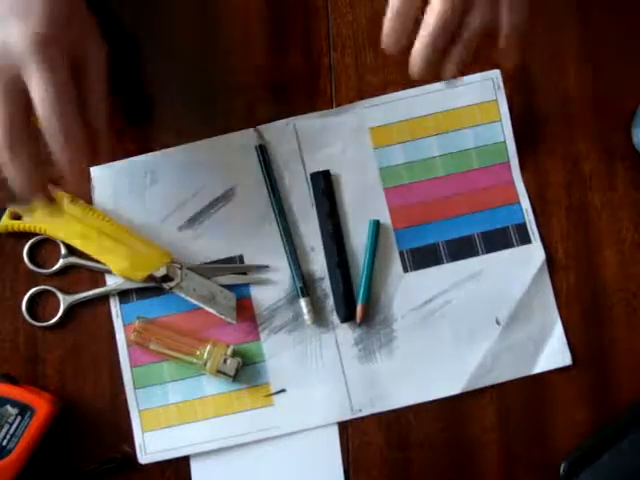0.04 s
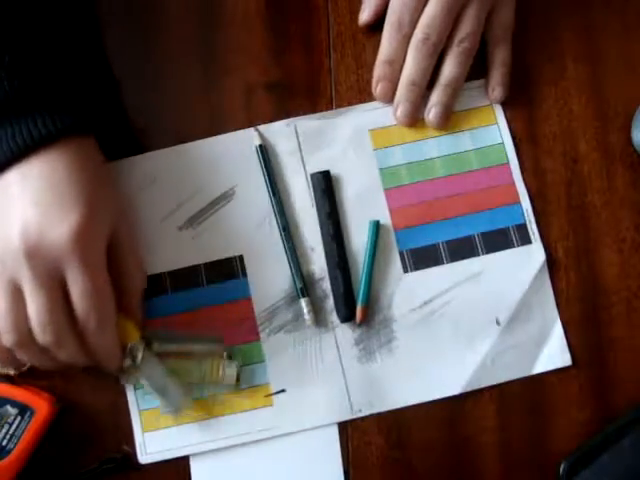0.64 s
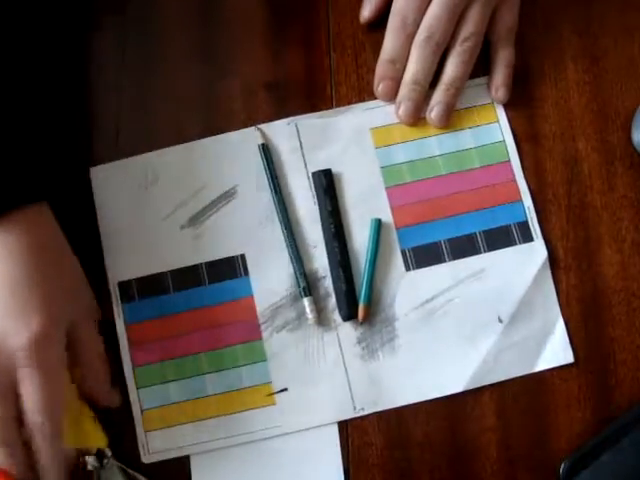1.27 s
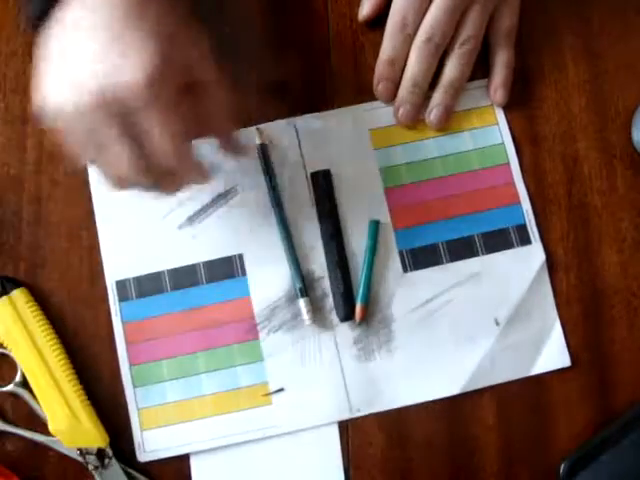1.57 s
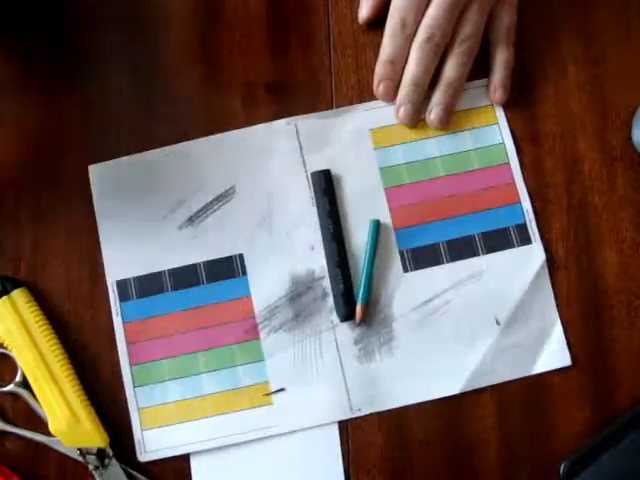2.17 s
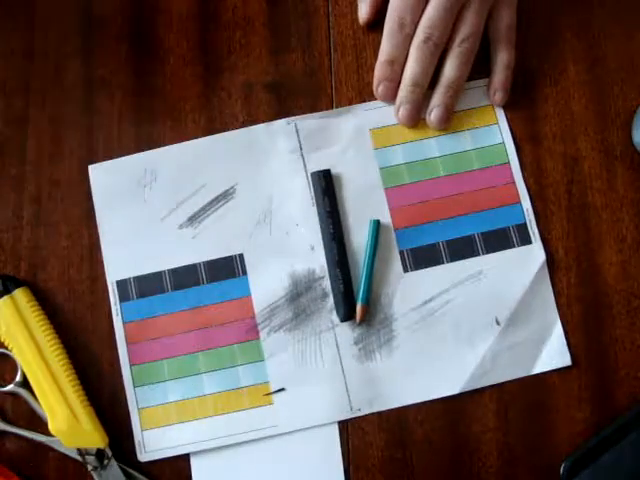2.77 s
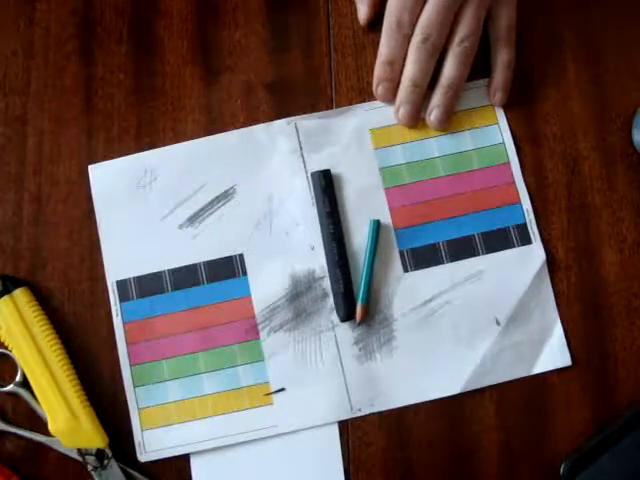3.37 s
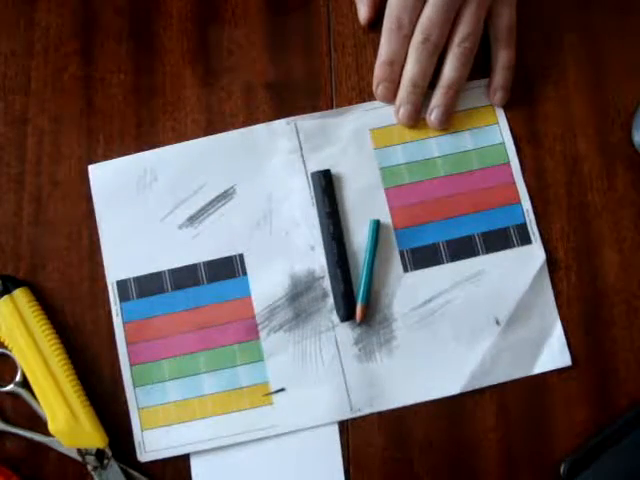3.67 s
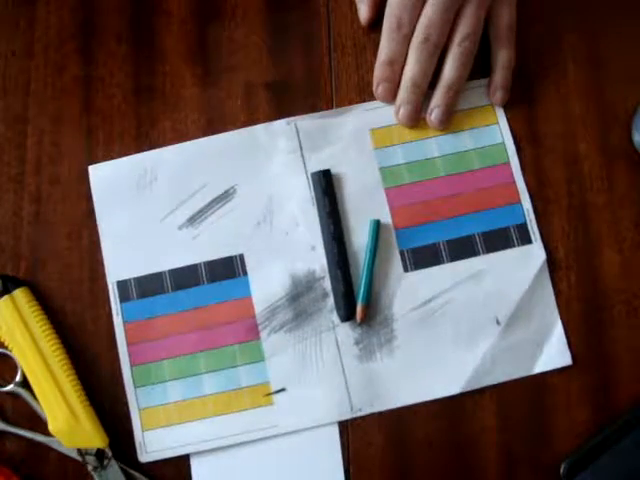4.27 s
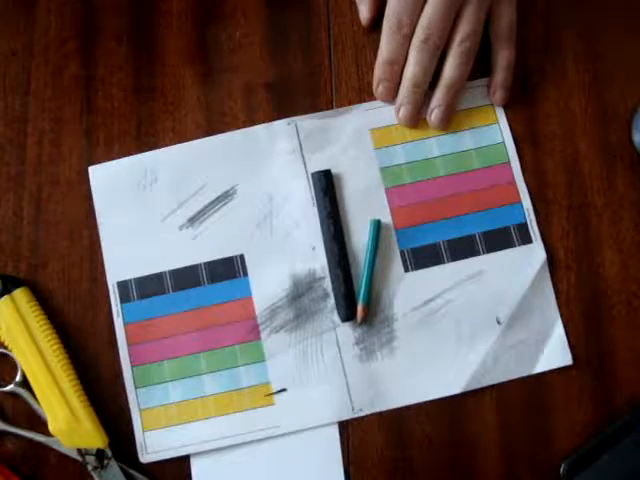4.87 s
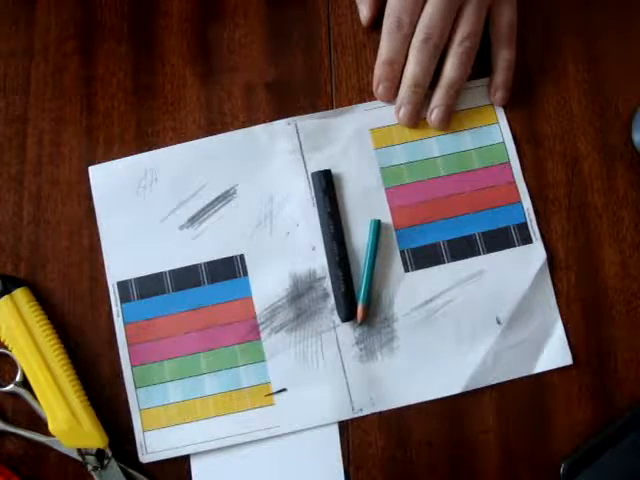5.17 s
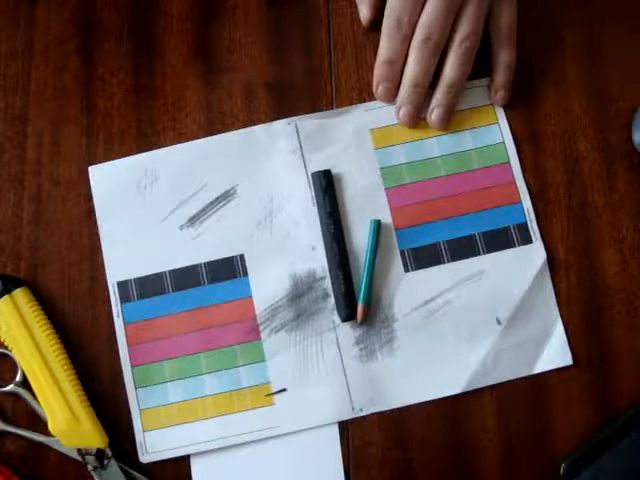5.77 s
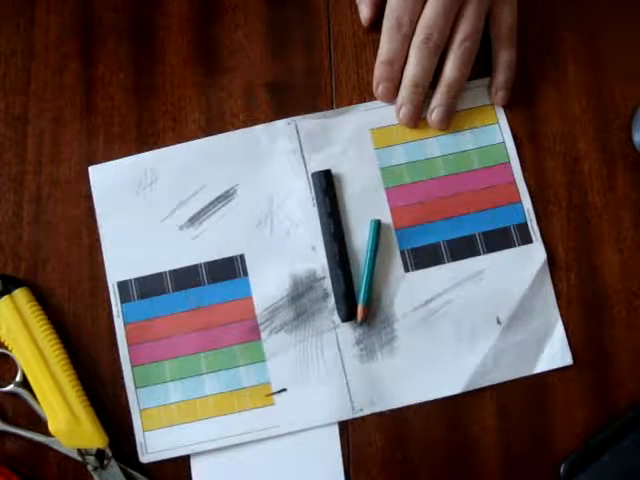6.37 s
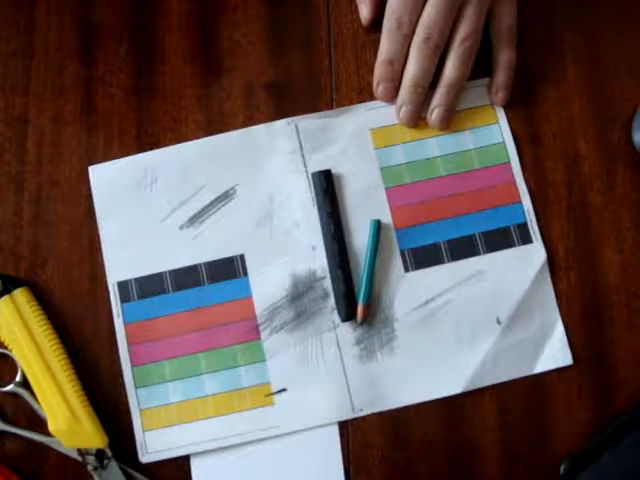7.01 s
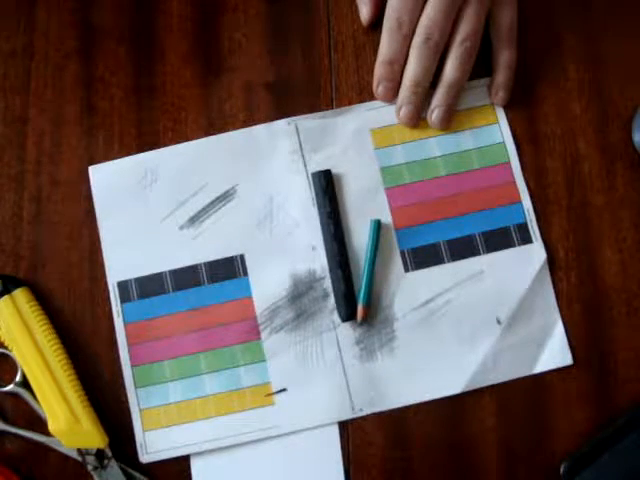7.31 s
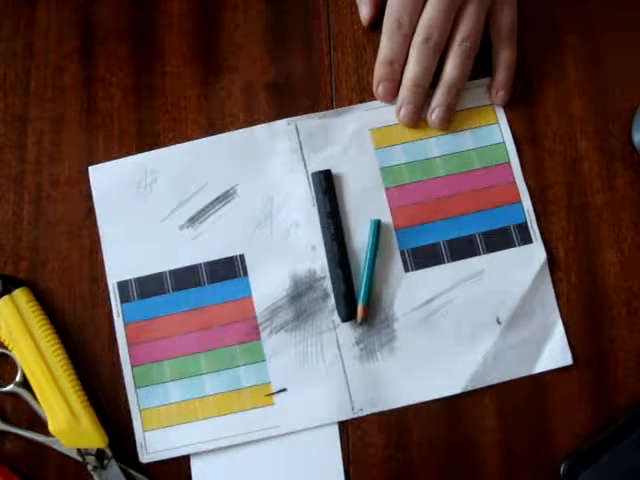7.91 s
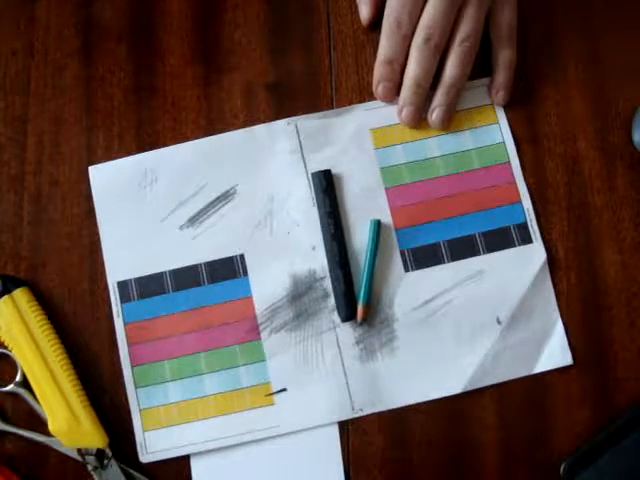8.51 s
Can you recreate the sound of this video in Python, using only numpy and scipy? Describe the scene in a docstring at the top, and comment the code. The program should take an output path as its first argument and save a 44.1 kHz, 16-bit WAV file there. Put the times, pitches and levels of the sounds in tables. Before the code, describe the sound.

A utility knife and steel scissors clink together, rasp over paper and drop onto a wooden table with a loud rattle and a soft thump. Fingers brush the paper, and a pencil slides off and taps the wood several times. Then a hand rummages among pencils in a small hollow box, making irregular clacks and light scrapes. The sound is close, in a quiet small room.

```python
"""Knife, scissors and pencils on a wooden table.

A utility knife and steel scissors are gathered, dragged over paper and dropped on the table.
A pencil is drawn off the paper and laid down; then a hand rummages among pencils in a small hollow box.
Each knock is a noisy crack over the object's ringing modes; each scrape is a stream of tiny slips.
The sound is close, in a quiet, small room."""
import sys
import numpy as np
from scipy import signal
from scipy.fft import rfft, irfft, next_fast_len
from scipy.io import wavfile

SR = 44100
rng = np.random.default_rng(int(sys.argv[2]) if len(sys.argv) > 2 else 0)


def inscribe(sig):
    """Save sig as 16-bit PCM at rate SR to the path in sys.argv[1].

    A 1-D sig is mono; a 2-D sig holds one channel per row.
    Samples are clipped to [-1, 1] before scaling.
    """
    pcm = np.round(np.clip(np.atleast_2d(sig).T, -1, 1) * 32767)
    wavfile.write(sys.argv[1], SR, pcm.astype(np.int16))


N = 381465
TIME = np.arange(N) / SR
RING_TIME = TIME[:SR * 2 // 5]  # 0.4 s for a knock or the room to ring out

# pencils knocking about in the box: start_s, clack_db, hardness_db (clack over thud)
BOX_HITS = [(3.756, -40, -3), (3.837, -43.5, -1.5), (3.943, -42.5, -10), (3.978, -39, -9.5),
            (4.1, -48, -7.5), (4.243, -43.5, -8.5), (4.385, -56.5, -17), (4.445, -30.5, 0.5),
            (4.463, -34, -8), (4.504, -22, -8.5), (4.514, -19.5, -1), (4.625, -32.5, 5),
            (4.645, -37.5, -6.5), (4.724, -37.5, -10.5), (4.772, -43, -19), (5.039, -48, -11),
            (5.213, -44.5, -5.5), (5.641, -53.5, -22), (5.656, -28.5, 5), (5.666, -32, -13),
            (5.74, -39, -12), (5.98, -50.5, -8), (6.05, -56, -17.5), (6.125, -50.5, -15),
            (6.49, -54.5, -22), (6.563, -41.5, -5), (6.607, -36.5, -5.5), (6.769, -45, -5.5),
            (6.967, -44, -5.5), (7.247, -37.5, 9), (7.263, -21.5, -9.5), (7.272, -30, -12),
            (7.307, -30, -7), (7.432, -40.5, -4), (7.553, -47, -10), (7.589, -35, 5), (7.626, -38, -4),
            (7.703, -29.5, 7.5), (7.756, -36, 2), (7.784, -40.5, -1.5), (7.917, -26.5, -4),
            (8.266, -33, 2.5), (8.285, -37.5, 7), (8.446, -43, 5)]


def from_db(db):
    """Decibels to gain."""
    return 10 ** (np.asarray(db) / 20)


def unit_rms(x):
    """Scale to unit rms."""
    return x / np.sqrt(np.mean(x ** 2) + 1e-20)


def unit_attack(x):
    """Scale a blow to unit rms over its first 16 ms."""
    return x / np.sqrt(np.mean(x[:int(.016 * SR)] ** 2) + 1e-20)


def at_hz(points, hz):
    """Read a table on a log-frequency axis."""
    freq_hz, value = np.transpose(points)
    return np.interp(np.log(hz), np.log(freq_hz), value)


def butter(x, hz, kind, order):
    """Causal Butterworth filter."""
    return signal.sosfilt(signal.butter(order, hz, kind, fs=SR, output="sos"), x + 1e-18)


def coloured(x, colour):
    """Shape a steady signal with an EQ curve; rms 1."""
    size = next_fast_len(len(x))
    hz = np.maximum(np.arange(size // 2 + 1) * SR / size, 1)
    spectrum = rfft(x, size) * from_db(at_hz(colour, hz))
    return unit_rms(irfft(spectrum, size)[:len(x)])


def decay(t60_s):
    """Envelope that loses 60 dB in t60_s."""
    return from_db(-60 * RING_TIME / t60_s)


def fader(points, fade_db_per_s=600):
    """Gain riding through (time_s, level_db) points, fading out beyond the ends."""
    time_s, level_db = np.transpose(points)
    beyond_s = np.maximum(time_s[0] - TIME, 0) + np.maximum(TIME - time_s[-1], 0)
    return from_db(np.interp(TIME, time_s, level_db) - fade_db_per_s * beyond_s)


def strokes(moves, rise_db_per_s, fall_db_per_s):
    """Gain of hand movements: each swells up to its start, holds and dies away."""
    power = 0
    for start_s, hold_s, level_db in moves:
        early_s, late_s = np.maximum(start_s - TIME, 0), np.maximum(TIME - start_s - hold_s, 0)
        drop_db = np.minimum(rise_db_per_s * early_s + fall_db_per_s * late_s, 100)
        power = power + from_db(level_db - drop_db) ** 2
    return np.sqrt(power)


def mode_rings(modes):
    """One decaying sine for each mode."""
    return np.array([from_db(db) * decay(t60_s) * np.sin(2 * np.pi * hz * RING_TIME)
                     for hz, db, t60_s in modes])


def blow(rings, colour, mode_db, crack_t60_s, body_t60_s, body_db, bounce, contact_s):
    """One contact: a crack, a crowd of short modes and the clear modes, struck again by tiny rebounds."""
    strengths = from_db(rng.normal(0, 3.0, len(rings)))
    crowd = coloured(rng.standard_normal(len(RING_TIME)), colour)
    crowd *= decay(crack_t60_s) + from_db(body_db) * decay(body_t60_s)
    strike = unit_attack(crowd) + from_db(mode_db) * unit_attack(strengths @ rings)
    strike *= 1 - np.exp(-(RING_TIME / contact_s) ** 2)  # the contact takes a moment to load
    out = strike.copy()
    rebounds_s = np.cumsum(rng.uniform(.002, .008, size=2))
    for lag in (rebounds_s * SR).astype(int) + 1:
        out[lag:] += bounce * rng.random() * strike[:-lag]
    return butter(out, 91, "high", order=2)  # small things radiate little bass


def knocks(hits, modes, colour, thud_top_hz, tick_db, tick_per_hardness, clack_top_hz=4400, **contact):
    """Blows in three bands: a harder contact has less thud under its clack and can have more tick."""
    out, rings = np.zeros(N + len(RING_TIME)), mode_rings(modes)
    for start_s, clack_db, hardness_db in hits:
        sound, start = blow(rings, colour, **contact), int(start_s * SR)
        thud = from_db(-hardness_db) * unit_attack(butter(sound, thud_top_hz, "low", order=4))
        clack = unit_attack(butter(sound, [thud_top_hz, clack_top_hz], "band", order=4))
        tick = unit_attack(butter(sound, clack_top_hz, "high", order=4))
        tick *= from_db(tick_db + tick_per_hardness * hardness_db)
        out[start:start + len(sound)] += from_db(clack_db) * (thud + clack + tick)
    return out[:N]


def friction(slips_per_s, spread_db):
    """Surfaces catch and slip: random clicks of uneven size."""
    sizes = from_db(spread_db * np.minimum(rng.exponential(1, N), 4))
    return (rng.random(N) < slips_per_s / SR) * sizes * rng.standard_normal(N)


def scrape(slips, modes, colour, mode_db):
    """Slips rasp directly and keep the object's modes ringing; rms 1."""
    response = rng.choice([-1, 1], len(modes)) @ mode_rings(modes)
    ringing = signal.fftconvolve(slips, response)[:N]
    return unit_rms(coloured(slips, colour) + from_db(mode_db) * unit_rms(ringing))


def room_tone(level_db=-50):
    """The quiet room's bed of soft, steady noise."""
    # EQ of the bed: freq_hz, gain_db
    air_colour = [(15, -54), (25, -15.5), (280, -6), (538, -1.5), (1030, -3.5), (2490, -8.5), (4340, -12.5),
                  (10200, -24.5), (13300, -46), (22000, -120)]
    return from_db(level_db) * coloured(rng.standard_normal(N), air_colour)


def room_reverb(x, wet_db, build_s):
    """Diffuse reflections build up quickly and die sooner in the treble."""
    # decay of the room: freq_hz, t60_s
    decay_times = [(130, 0.61), (600, 0.2), (2500, 0.12), (9000, 0.047)]
    tail, edges_hz = 0, np.geomspace(80, 12000, 8)
    for low, high in zip(edges_hz, edges_hz[1:]):
        band = butter(rng.standard_normal(len(RING_TIME)), [low, high], "band", order=2)
        tail = tail + band * decay(at_hz(decay_times, np.sqrt(low * high)))
    tail *= 1 - np.exp(-(RING_TIME / build_s) ** 2)
    return x + from_db(wet_db) * signal.fftconvolve(x, tail / np.linalg.norm(tail))[:N]


def low_thumps():
    """Low, soft thumps: a hand on the table, and the boom under the loudest blows."""
    # the thumps: start_s, level_db
    thumps = [(1.134, -38), (1.254, -35), (1.718, -42), (2.251, -38.5), (7.279, -41), (7.953, -44.5)]
    # low modes ringing in each thump: pitch_hz, level_db, t60_s
    modes = [(122, 0, .16), (145, -5, .12), (212, -4, .13)]
    impulses = np.zeros(N)
    for start_s, level_db in thumps:
        impulses[int(start_s * SR)] = from_db(level_db)
    boom = unit_attack(mode_rings(modes).sum(axis=0))
    return signal.fftconvolve(impulses, boom)[:N]


def pencil_on_table():
    """Fingers brush the paper; the pencil slides off and taps the table."""
    # finger and pencil taps: start_s, clack_db, hardness_db
    hits = [(0.241, -63, 12), (1.738, -37.5, 13), (2.242, -36, -9), (2.279, -27.5, 4.5), (2.465, -29, 11),
            (2.481, -38, 9), (2.5, -28, 22), (2.604, -26.5, 18), (2.699, -37.5, 3), (2.884, -39.5, 2.5),
            (3.138, -45, -2), (3.232, -48.5, 1)]
    # clear modes of a tap: pitch_hz, level_db, t60_s
    modes = [(393, -4, 0.18), (528, -0.5, 0.066), (689, 1, 0.16), (847, 4, 0.06), (1493, -0.5, 0.1),
             (2238, 6.5, 0.077), (2970, -30, 0.027)]
    # EQ of its crowd of weaker modes: freq_hz, gain_db
    colour = [(60, -4), (250, -1.5), (800, 4.5), (1200, -2.5), (3200, 1.5), (10200, -19)]
    # the pencil slides off the paper, then rolls on the wood: start_s, hold_s, level_db
    slides = [(2.0, 0.065, -34.5), (2.22, 0.047, -36.5), (2.62, 0.0067, -37)]
    # EQ of the slide: freq_hz, gain_db
    slide_colour = [(90, -61), (260, 3.5), (360, -3.5), (520, 3), (700, -24), (1000, 6), (1350, -6.5),
                    (2100, 0.5), (4500, -1), (6000, -20.5)]
    # fingers brushing the paper: start_s, hold_s, level_db
    brushes = [(.26, 0.025, -45.5), (1.795, 0.012, -32), (1.91, 0.13, -39.5), (2.03, 0.084, -47.5),
               (2.17, 0.12, -43), (3.32, 0.2, -53)]
    # EQ of that papery hiss: freq_hz, gain_db
    brush_colour = [(1000, -34.5), (3800, 2), (5300, 8), (6800, 0), (8500, 0), (10200, -12)]
    taps = knocks(hits, modes, colour, thud_top_hz=1060, tick_db=-9.5, tick_per_hardness=0.065,
                  mode_db=-8, crack_t60_s=0.022, body_t60_s=0.23, body_db=-3.5,
                  bounce=0.27, contact_s=0.00059)
    slide = scrape(friction(slips_per_s=6700, spread_db=0), modes, slide_colour, mode_db=-8)
    slide *= strokes(slides, rise_db_per_s=207, fall_db_per_s=176)
    brush = coloured(friction(slips_per_s=6700, spread_db=4), brush_colour)
    brush *= strokes(brushes, rise_db_per_s=276, fall_db_per_s=276)
    return taps + slide + brush


def pencil_clinks(over_clack_db=-6, db_per_hardness=.5, pitch_spread=.03):
    """The harder a knock in the box, the more the struck pencil itself rings, each at its own pitch."""
    # bending modes of a loose pencil: pitch_hz, level_db, t60_s
    modes = [(2290, -0.5, 0.19), (2920, -2.5, .11)]
    out = np.zeros(N + len(RING_TIME))
    tunings = 1 + pitch_spread * rng.uniform(-0.98, 1, len(BOX_HITS))
    for (start_s, clack_db, hardness_db), tuning in zip(BOX_HITS, tunings):
        ring = mode_rings([(hz * tuning, db, t60_s) for hz, db, t60_s in modes]).sum(axis=0)
        clink = unit_attack(butter(ring, [1800, 3400], "band", order=2))
        level_db = clack_db + over_clack_db + db_per_hardness * hardness_db
        start = int(start_s * SR)
        out[start:start + len(clink)] += from_db(level_db) * clink
    return out[:N]


def box_rummage():
    """Pencils knock and shift against the hollow box, whose walls ring."""
    # clear modes of the box: pitch_hz, level_db, t60_s
    modes = [(371, -25, .28), (640, -6, .13), (665, 1, .19), (692, 0, .18), (803, -3, .18), (930, -14, .14),
             (1280, -14, .14), (1455, -10, .14), (2150, -8, .13), (2285, -3, .21), (2390, -6, .18),
             (2870, -9, .16), (3030, -8, .18), (3530, -6, .16), (3780, -10, .17), (5390, -14, .16),
             (6220, -19, .18), (7880, -23, .15)]
    # EQ of its crowd of weaker modes: freq_hz, gain_db
    colour = [(90, -19), (260, -23), (380, -1.5), (560, -12.5), (780, 1.5), (1150, -9.5), (1800, -9),
              (2250, -2), (2650, -9.5), (3000, -8.5), (3650, -12), (4300, -18), (6000, -16.5), (10200, -25)]
    # the hand stays in the box, stirring lightly: start_s, hold_s, level_db
    stirring = [(3.8, 4.8, -58)]
    # it pushes pencils aside now and then: start_s, hold_s, level_db
    pushes = [(5.293, 0.11, -48.5), (5.733, .07, -44), (6.06, 0.038, -44), (6.497, 0.087, -46),
              (7.147, 0.25, -44.5), (8.08, 0.049, -46.5)]
    clatter = knocks(BOX_HITS, modes, colour, thud_top_hz=1690, tick_db=-5.5, tick_per_hardness=0,
                     mode_db=4.5, crack_t60_s=0.19, body_t60_s=0.23, body_db=16,
                     bounce=0.19, contact_s=0.0012)
    slips = friction(slips_per_s=4000, spread_db=2.5)
    hand_gain = strokes(stirring + pushes, rise_db_per_s=117, fall_db_per_s=130)
    return clatter + pencil_clinks() + hand_gain * scrape(slips, modes, colour, mode_db=2)


def knife_and_scissors():
    """The steel tools clatter together, rattle and rasp over the paper."""
    # the tools knocking together: start_s, clack_db, hardness_db
    hits = [(0.343, -21, 8.5), (0.35, -19.5, 9.5), (0.361, -24.5, 13), (0.384, -21, 12.5),
            (0.492, -26.5, 11), (0.637, -41.5, 0.5), (0.703, -41, 10), (0.792, -29.5, -3), (0.962, -40, 7),
            (0.995, -45.5, -11), (1.069, -32.5, -1), (1.131, -34, 5.5), (1.201, -23, 15), (1.233, -19, 10),
            (1.253, -14, 25), (1.289, -18.5, 29), (1.317, -23, 13.5), (1.353, -35, 13)]
    # their clear modes: pitch_hz, level_db, t60_s
    modes = [(296.4, -2.5, 0.14), (371.4, 0.5, 0.2), (792, -14.5, 0.65), (1270, 2.5, 0.08),
             (1338, 6.5, 0.13), (1420, -1, 0.15), (1820, -13, .2), (2225, 14.5, 0.027), (2673, 15, 0.03),
             (2900, -4.5, 0.091), (3700, -16, 0.039), (3770, -4, 0.24), (9710, 9, 0.034)]
    # EQ of their crowd of weaker modes: freq_hz, gain_db
    colour = [(80, -39), (150, -4.5), (330, -2.5), (800, -1), (1300, -3), (1800, -3), (3300, 2),
              (7000, -10), (10200, -14.5)]
    # loose blade and scissor joint, rattling on pick-up and drop: start_s, hold_s, level_db
    rattles = [(.375, 0.014, -41), (1.205, 0.103, -24)]
    # how hard the tools are dragged: time_s, level_db
    drag_levels = [(.42, -40), (.6, -39.5), (.69, -32.5), (.77, -37), (1.01, -34), (1.18, -39),
                   (1.46, -52.5)]
    # EQ of the drag: freq_hz, gain_db
    drag_colour = [(60, -3), (200, -16), (340, -2.5), (500, -11), (1600, -3), (2100, -8.5), (5200, -6),
                   (10200, -18)]
    clatter = knocks(hits, modes, colour, thud_top_hz=1120, tick_db=-8, tick_per_hardness=0.19,
                     mode_db=-3, crack_t60_s=0.03, body_t60_s=0.14, body_db=-0.5,
                     bounce=0.62, contact_s=0.0025)
    rattle = scrape(friction(slips_per_s=1200, spread_db=2), modes, colour, mode_db=-2.5)
    rattle *= strokes(rattles, rise_db_per_s=1500, fall_db_per_s=654)
    drag_modes = modes[:-1]  # paper is too soft to wake the highest mode
    drag = scrape(friction(slips_per_s=7000, spread_db=2.5), drag_modes, drag_colour, mode_db=-9)
    drag = fader(drag_levels) * butter(drag, 90, "high", order=2)
    return clatter + rattle + drag


def scene():
    """All the handling, with a touch of reverb, over the room tone; mono."""
    bed = room_tone()
    handling = knife_and_scissors() + pencil_on_table() + box_rummage() + low_thumps()
    return (room_reverb(handling, wet_db=-24, build_s=0.026) + bed)[None]


def record(dry):
    """Lopsided soft clipping flattens the loudest peaks and adds a low thump; the top is cut steeply."""
    ceiling = np.where(dry > 0, .7, .56)
    clipped = dry / (1 + (dry / ceiling) ** 8) ** .125
    cutoff_hz = 10200
    return signal.sosfilt(signal.ellip(12, .2, 70, cutoff_hz, fs=SR, output="sos"), clipped)


dry = scene()
out = record(dry)
inscribe(out)
```